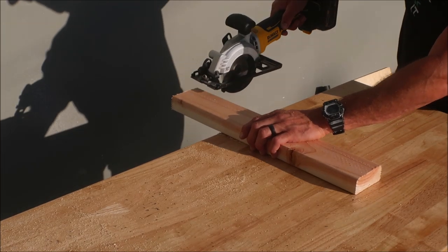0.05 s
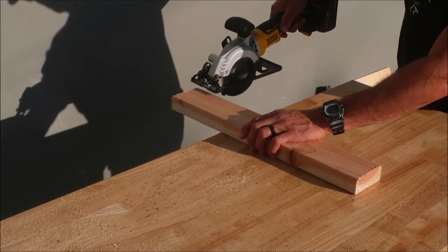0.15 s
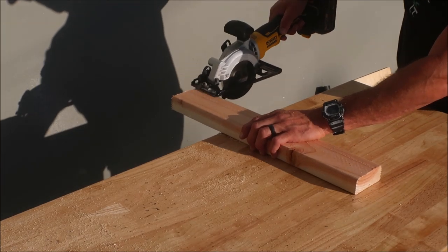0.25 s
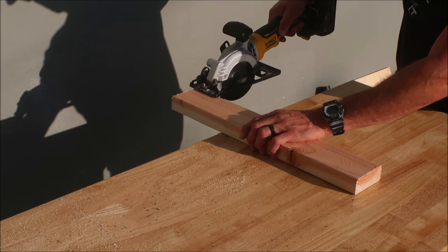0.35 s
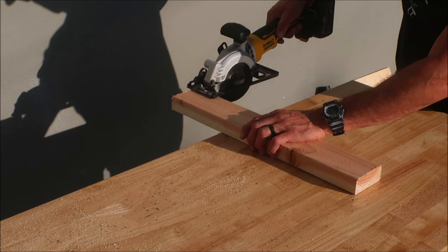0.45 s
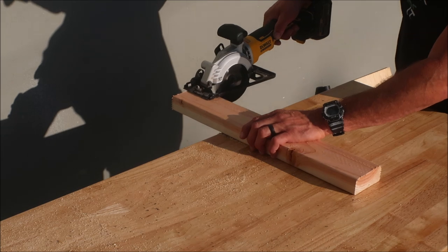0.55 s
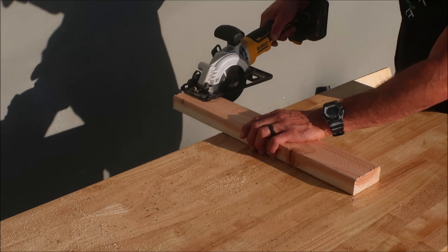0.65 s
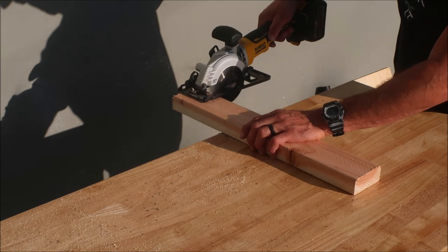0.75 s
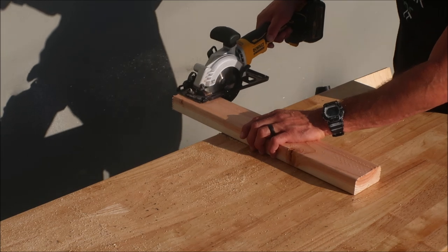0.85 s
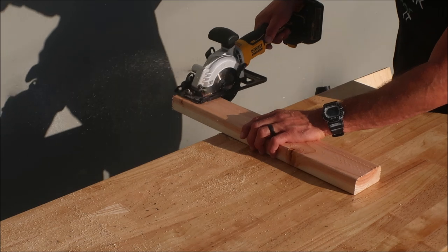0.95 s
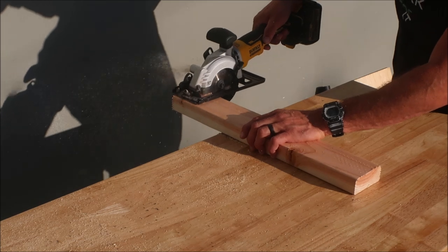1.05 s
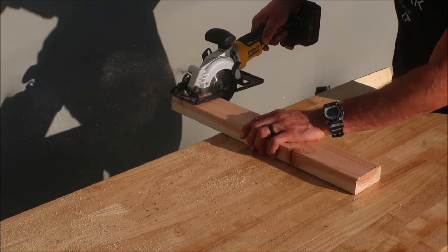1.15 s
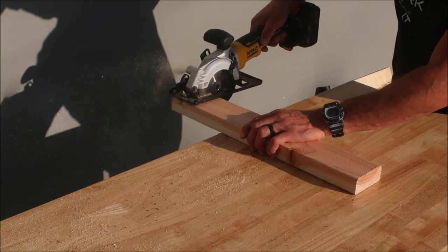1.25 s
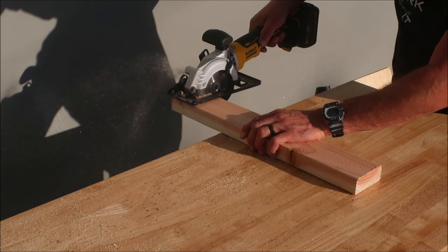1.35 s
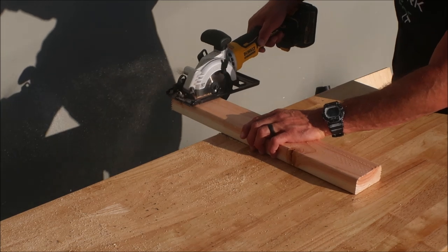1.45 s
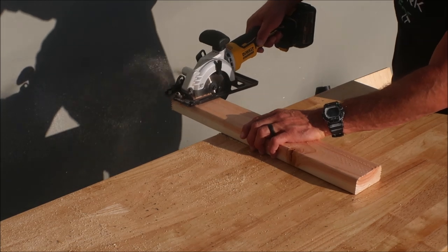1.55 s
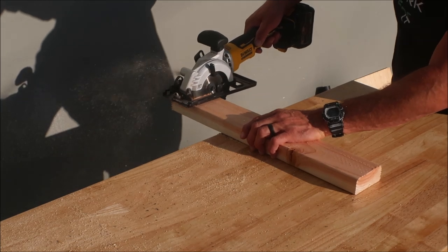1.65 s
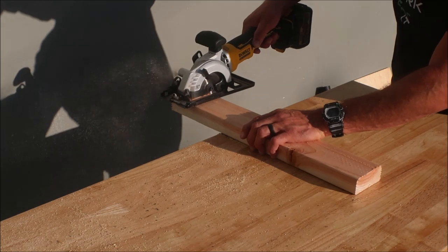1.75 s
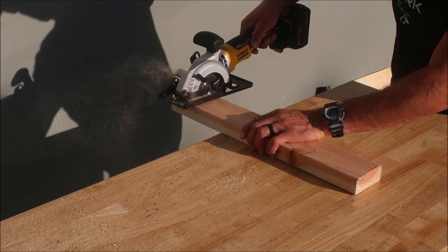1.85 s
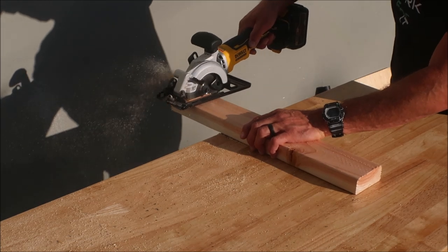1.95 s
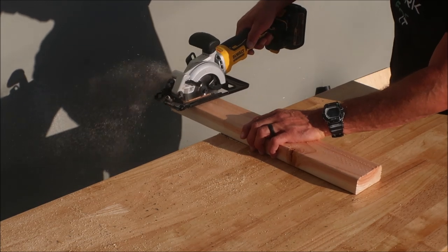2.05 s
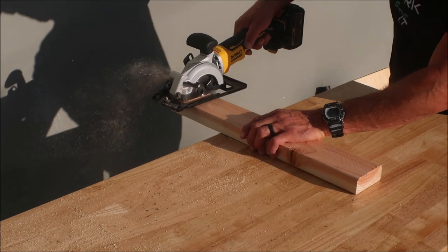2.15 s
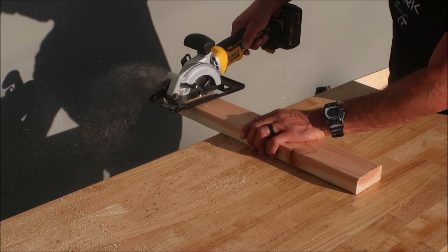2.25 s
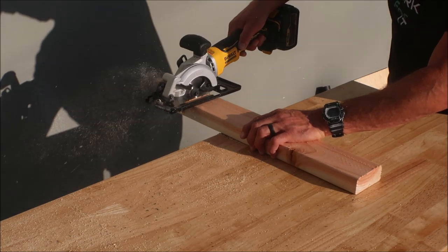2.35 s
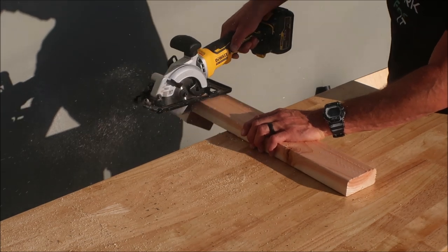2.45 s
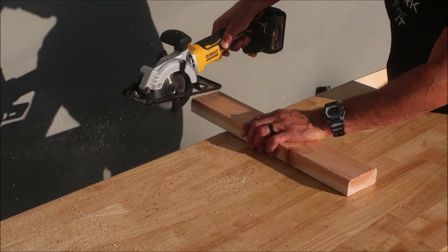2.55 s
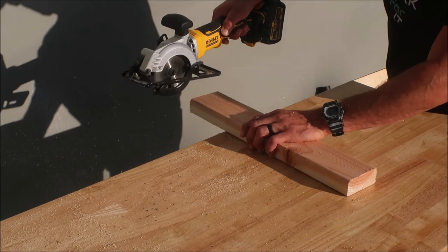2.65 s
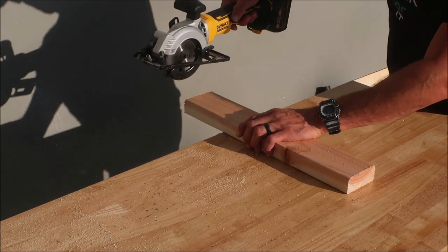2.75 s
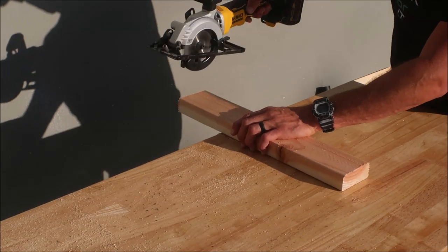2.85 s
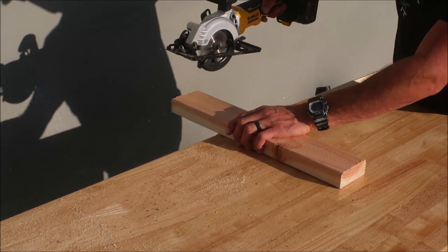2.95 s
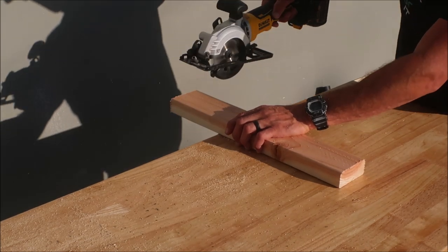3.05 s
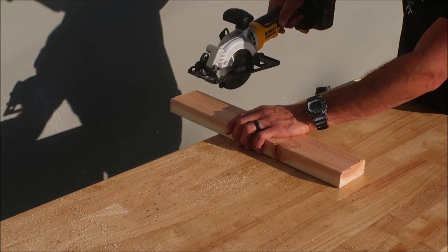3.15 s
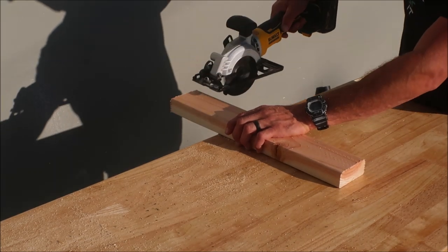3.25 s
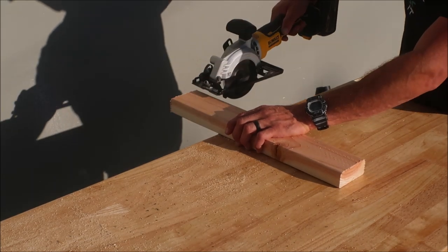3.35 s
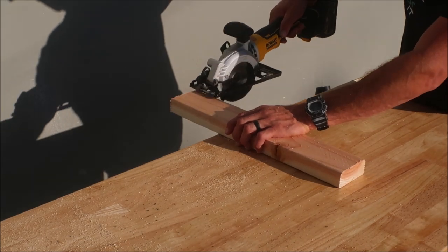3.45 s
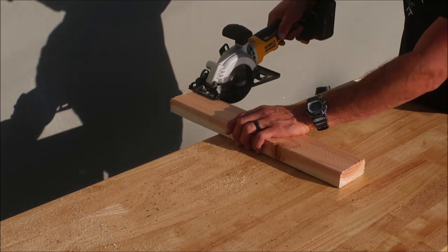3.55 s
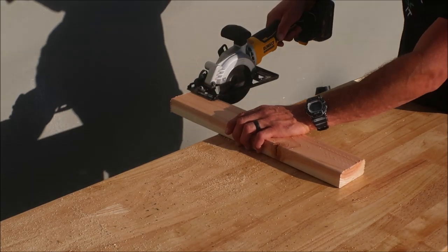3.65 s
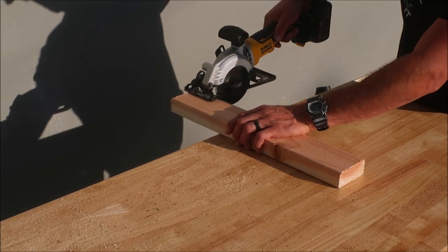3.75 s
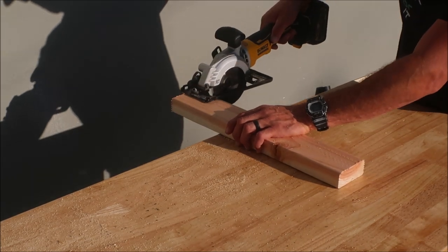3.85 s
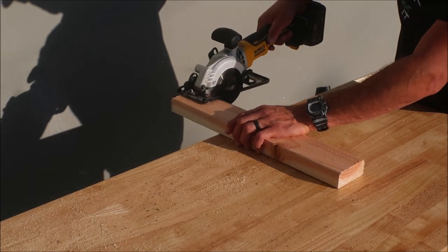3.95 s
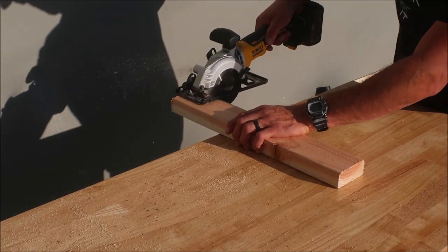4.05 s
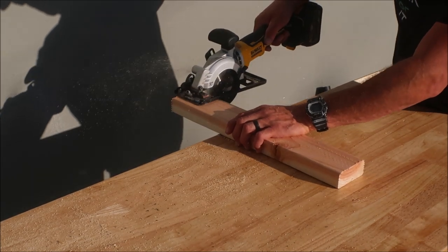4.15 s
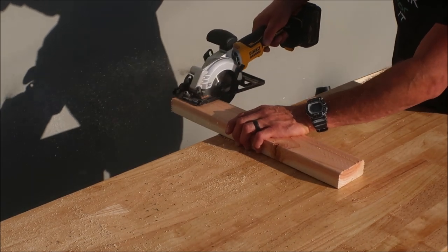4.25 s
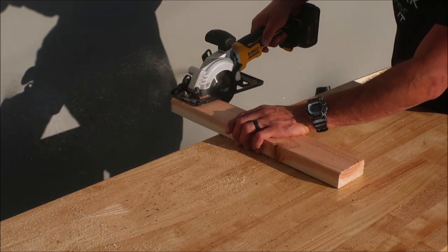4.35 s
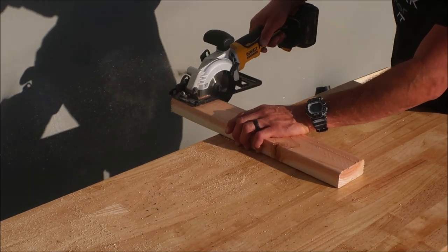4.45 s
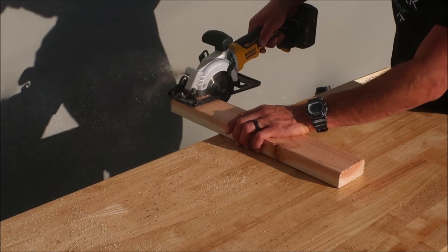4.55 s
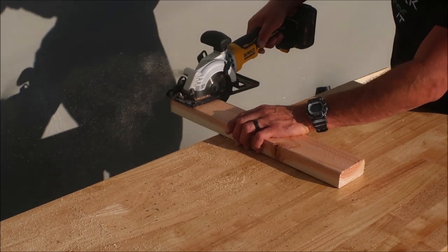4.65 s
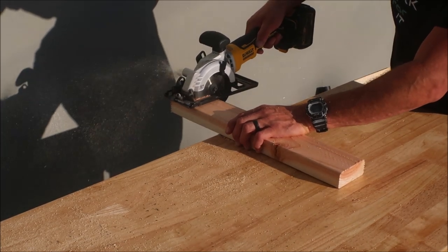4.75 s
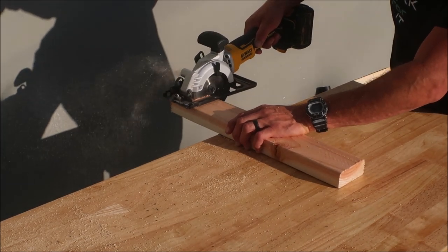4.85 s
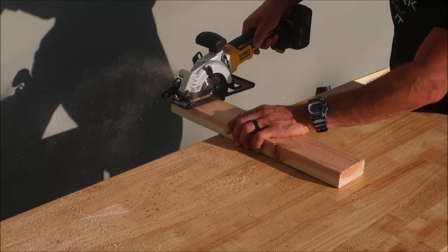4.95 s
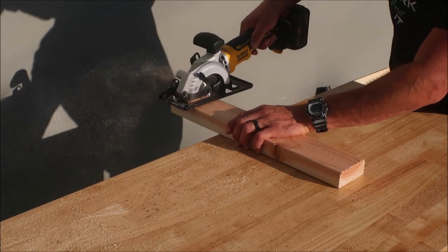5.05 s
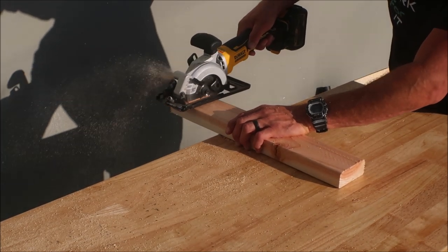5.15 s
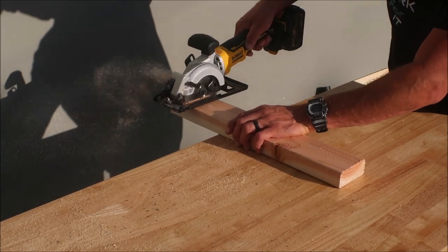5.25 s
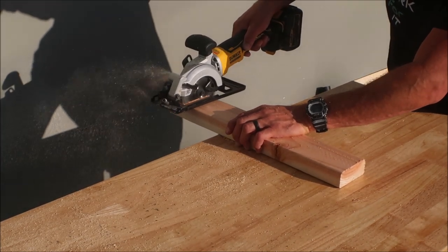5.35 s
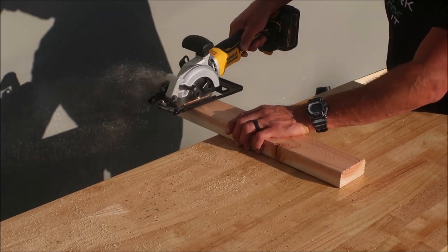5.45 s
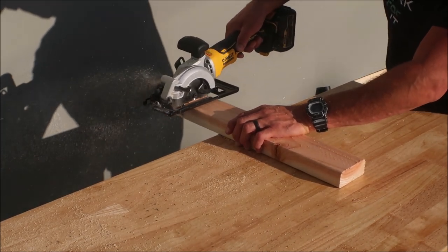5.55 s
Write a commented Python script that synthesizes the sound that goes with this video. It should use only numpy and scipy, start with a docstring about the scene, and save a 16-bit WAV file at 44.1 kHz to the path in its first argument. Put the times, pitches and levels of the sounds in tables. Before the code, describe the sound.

A small cordless circular saw whines steadily, then screeches through a wooden board twice, an offcut knocking down between the cuts.

```python
"""Circular saw on a wooden board

A small cordless circular saw runs over a bench outdoors and cuts twice through a board; an offcut drops.
Motor orders and gear whine sound as sines over the noise of the fan. Tooth blows excite resonances: the
skimming teeth make the steel blade ring, then the wood damps the sinking blade to a rasp and the motor labours.
Each cut is a touch, a few pushes, a sinking that slows the motor, and a release that lets it race."""
import sys
import numpy as np
from scipy import signal
from scipy.fft import rfft, irfft
from scipy.io import wavfile
from scipy.ndimage import map_coordinates

SR = 44100
rng = np.random.default_rng(int(sys.argv[2]) if len(sys.argv) > 2 else 0)


def output_pcm(signal):
    """Save a mono or channel-first signal as 16-bit PCM at the path in sys.argv[1].

    Samples are clipped to [-1, 1] before scaling.
    """
    pcm = np.clip(np.atleast_2d(signal).T, -1, 1) * 32767
    wavfile.write(sys.argv[1], SR, np.round(pcm).astype(np.int16))


N = 247401
TIME = np.arange(N) / SR
FREQ = np.maximum(np.arange(N // 2 + 1) * SR / N, 1)  # Hz
WHINE_ORDER, GEAR_RATIO, TEETH = 8, 6, 24  # whine cycles per motor turn, motor turns per blade turn, blade teeth


def undb(db):
    """Logarithmic level: decibels to amplitude gain."""
    return 10 ** (np.asarray(db) / 20)


def curves(rows):
    """Linear interpolation: each column of a table as a value per sample."""
    s, *columns = np.transpose(rows)
    return [np.interp(TIME, s, c) for c in columns]


def colour(points):
    """Spectral envelope: gain through (Hz, dB) points, straight over log frequency."""
    hz, db = np.transpose(points)
    return undb(np.interp(np.log(FREQ), np.log(hz), db))


def modes(rows, order=1):
    """Modal superposition of damped resonances in alternating sense; a higher order has steeper flanks."""
    response = 0
    for k, (hz, width, db) in enumerate(rows):
        detuning = (FREQ ** 2 - hz ** 2) / (FREQ * width * order)
        response = response + (-1) ** k * undb(db) / (1 + 1j * detuning) ** order
    return response


def through(x, response):
    """Linear filtering: multiply the spectrum by a response."""
    return irfft(rfft(x) * response, N)


def unit(x, lo_hz=0, hi_hz=SR):
    """Normalisation: scale a sound so that one band of it has rms 1."""
    return x / np.std(through(x, (FREQ > lo_hz) & (FREQ < hi_hz)))


def noise():
    """White noise: equal power at every frequency."""
    return rng.standard_normal(N)


def walk(rate_hz, size=32768):
    """Low-passed random fluctuation of standard deviation 1."""
    hz = np.arange(size // 2 + 1) * SR / N
    x = irfft(rfft(rng.standard_normal(size)) / (1 + (hz / rate_hz) ** 4), size)
    return np.interp(TIME, np.linspace(0, N / SR, size), x / np.std(x))


def split(x, hz):
    """Complementary crossover: the parts of a sound below and above a frequency."""
    low = through(x, 1 / (1 + (FREQ / hz) ** 24))
    return low, x - low


def ramp(start_s, length_s):
    """Linear envelope rising from 0 to 1."""
    return np.clip((TIME - start_s) / max(length_s, 1e-4), 0, 1)


def swell(top_s, rise_s, fall_s):
    """Triangular envelope: a straight rise to 1 and a straight fall."""
    return ramp(top_s - rise_s, rise_s) - ramp(top_s, fall_s)


# the two cuts: land_s (plate), touch_s (teeth), swing_s (guard swings back), sink_s, deepest_s, out_s (through),
# sag_hz (drop of the whine), release_power (lateness of release), plate_db (hum), ping_db (first touch),
# board_db, offcut_db, hold_s (governor holds the speed), skim_db (note of the skimming teeth)
CUTS = [(0.34, 0.683, 1.14, 1.68, 2.30, 2.455, 480.7, 3.0, -58.5, -37, -38, -55.5, .08, -59),
        (3.795, 3.936, 4.54, 4.95, 5.42, 5.645, 345.8, 1.3, -68, -28, -38.5, -63, .03, -52.5)]
CUT_COLUMNS = ("land_s touch_s swing_s sink_s deepest_s out_s sag_hz release_power "
               "plate_db ping_db board_db offcut_db hold_s skim_db").split()


def cuts(names):
    """Event timing and levels: the named columns of each cut."""
    return [[row[CUT_COLUMNS.index(name)] for name in names.split()] for row in CUTS]


TOUCH_S, EXIT_S = 0.0058, 0.074  # the teeth meet and leave the wood
SINK_POWER = 0.25  # the round blade buries itself fast at first, then slowly
FREE_HZ = 3539  # gear whine of the free-running saw
TOUCH_DIP_HZ, DIP_S, DIP_RECOVER_S = 88.8, .055, .5  # the first touch brakes the motor
RACE_DELAY_S = .009  # the load is gone this long after the blade is through
OVERSHOOT_HZ, HUNT_HZ, HUNT_DECAY_S = 753.4, 2.85, .088  # once through, the motor races and settles


def feed():
    """Load and speed: contact, depth and motor strain (each 0-1) and the whine in Hz, which load lowers."""
    contact, depth, strain, hz = 0, 0, 0, FREE_HZ
    columns = "touch_s sink_s deepest_s out_s sag_hz release_power hold_s"
    for touch, sink, deepest, out, sag_hz, release_power, hold_s in cuts(columns):
        race = out + RACE_DELAY_S
        held = 1 - ramp(deepest, race - deepest) ** release_power
        load = held * np.sin(np.pi / 2 * ramp(sink + hold_s, deepest - sink - hold_s)) ** 2
        since = np.maximum(TIME - race, 0)
        hunt = OVERSHOOT_HZ * np.exp(-since / HUNT_DECAY_S) * np.sin(2 * np.pi * HUNT_HZ * since)
        dip = TOUCH_DIP_HZ * swell(touch + DIP_S, DIP_S, DIP_RECOVER_S)
        hz = hz - dip - sag_hz * load + hunt
        contact = contact + ramp(touch, TOUCH_S) - ramp(out - EXIT_S / 2, EXIT_S)
        sunk = ramp(sink, deepest - sink) ** SINK_POWER
        depth = depth + sunk * (1 - ramp(out - EXIT_S / 2, EXIT_S / 2))
        strain = strain + load
    return contact, depth, strain, hz


# the buried blade grabs and shakes the gears: start_s, end_s, level_db
JUDDERS = [(2.143, 2.156, -35), (2.17, 2.178, -25), (2.225, 2.256, -32), (2.292, 2.336, -30.5),
           (2.375, 2.39, -34), (5.204, 5.238, -36), (5.34, 5.407, -36), (5.504, 5.549, -36)]


def judders(edge_s=0.0097):
    """Intermittent grabbing: strength of the bursts in which the buried blade catches."""
    bursts = 0
    for start, end, db in JUDDERS:
        gate = ramp(start - edge_s / 2, edge_s) - ramp(end - edge_s / 2, edge_s)
        bursts = bursts + undb(db) * gate
    return bursts


# bursts of tooth noise: harder pushes into the wood, and a short ringing tail as the blade comes out:
# start_s, end_s, level_db, treble_db (relative to level_db)
BITES = [(0.699, 0.742, -24, -21), (0.777, 0.807, -32.5, -11), (0.831, 0.855, -29, -11.5),
         (0.86, 0.918, -36, -3.5), (0.923, 0.995, -33.5, -4.5), (0.985, 1.092, -31.5, -10),
         (1.092, 1.198, -33, -6), (1.19, 1.247, -30.5, -17), (1.397, 1.448, -29, -13.5),
         (1.451, 1.57, -29, -13.5), (1.668, 1.718, -31.5, -18), (1.76, 1.888, -31, -14),
         (1.915, 1.966, -33, -9), (2.053, 2.18, -34, -13), (2.28, 2.4, -39, -31),
         (2.432, 2.447, -25.5, -30), (2.476, 2.502, -42, -12), (3.944, 4.019, -33, -7),
         (4.021, 4.11, -30, -8), (4.133, 4.202, -37, -10), (4.211, 4.235, -28.5, -8.5),
         (4.244, 4.544, -31.5, -8), (4.659, 4.683, -30.5, -24), (4.693, 4.722, -27.5, -14),
         (4.724, 4.795, -28, -14), (4.845, 4.977, -32, -11.5), (5, 5.148, -31, -9.5),
         (5.13, 5.409, -41.5, 0.5), (5.412, 5.544, -32.5, -9.5)]
BITE_ATTACK_S, BITE_RELEASE_S = 0.031, 0.034


def bite(contact, depth, judder):
    """Power addition: tooth noise and its treble sum a light skim, the depth and the bursts."""
    skim_db, buried_db, judder_db, grain_db = -40, -40, -7, -0.06
    skim_treble_db, buried_treble_db = -44, -53.5
    power = (contact * undb(skim_db)) ** 2 + (depth * undb(buried_db)) ** 2 + (judder * undb(judder_db)) ** 2
    treble = (contact * undb(skim_treble_db)) ** 2 + (depth * undb(buried_treble_db)) ** 2
    for start, end, db, bright_db in BITES:
        attack = ramp(start - BITE_ATTACK_S / 2, BITE_ATTACK_S)
        burst = attack - ramp(end - BITE_RELEASE_S / 2, BITE_RELEASE_S)
        power = power + (burst * undb(db)) ** 2
        treble = treble + (burst * undb(db + bright_db)) ** 2
    grain = undb(grain_db * walk(12))
    return grain * np.sqrt(power), np.sqrt(grain * treble)


# spectrum of the rumble: frequency_hz, level_db
RUMBLE_COLOUR = [(20, -18), (35, -7), (55, 9), (67, -9), (84, 11.5), (105, 5.5), (150, -0.5), (300, -29.5)]
# level of the deepest rumble: time_s, level_db
DEEP_RUMBLE = [(0.0, -71), (0.64, -64), (0.87, -80), (2.53, -75), (4.27, -59.5), (4.62, -73), (5.28, -62),
               (5.61, -72)]
GUST_RISE_S, GUST_FALL_S = 1.15, 0.54  # the rumble swells as the saw comes down on the board


def rumble(calm_db=-68, gust_db=14):
    """Low-frequency noise of moving air, swelling before each cut."""
    gust = sum(swell(touch, GUST_RISE_S, GUST_FALL_S) for touch, in cuts("touch_s"))
    deep, upper = split(through(noise(), colour(RUMBLE_COLOUR)), 66)
    deep_db, = curves(DEEP_RUMBLE)
    return undb(calm_db + gust_db * gust) * unit(upper) + undb(deep_db) * unit(deep)


# rush of fan and spinning blade, before the trim: time_s, level_db
AIR = [(0, -38.5), (.3, -37), (.7, -33.5), (1.2, -37), (1.35, -41), (1.7, -40), (2.38, -35.5), (2.56, -43),
       (2.85, -41), (3.5, -36.5), (3.93, -33), (4.5, -38.5), (4.6, -43), (5.05, -39), (5.61, -37)]
# spectrum of the rush: frequency_hz, level_db
AIR_COLOUR = [(76, -43), (130, -16.5), (331, -15.5), (825, -11.5), (1360, -5), (1590, -9.5), (2180, 0.5),
              (2770, -5), (3590, -3), (3810, -4.5), (5450, -12), (8200, -30.5), (10400, -33.5),
              (13900, -47), (15000, -67)]
# motor housing resonances, relative levels: frequency_hz, width_hz, level_db
HOUSING = [(1310, 68, -5), (2080, 170, -14), (2432, 115, 7.5), (3056, 73, 9), (5300, 88, 4), (6600, 110, 9)]


def air(turns, contact, covered_db=-3, rattle_db=1.0, throb=0.096, housing_db=-3.0, trim_db=-2.09, treble_db=-9):
    """Amplitude-modulated noise: fan rush and gear rattle pulse once a blade turn; contact thins the bass."""
    level_db, = curves(AIR)
    pulse = 1 + throb * np.sin(2 * np.pi * turns / GEAR_RATIO)
    rush = noise() * undb(rattle_db * walk(740)) * pulse
    shell = np.sqrt(1 + np.abs(undb(housing_db) * modes(HOUSING)) ** 2)
    low, high = split(through(rush, colour(AIR_COLOUR) * shell), 3640)
    low, high = unit(low, 1200, 3200), unit(high, 4000, 7000)
    bass, middle = split(low, 665)
    return undb(level_db + trim_db) * (undb(covered_db * contact) * bass + middle + undb(treble_db) * high)


OFFCUT_HZ, OFFCUT_FALL_HZ_PER_S = 170, 108  # sway of the offcut at the moment it parts, and its steady fall
OFFCUT_RISE_S, OFFCUT_FADE_S = 0.33, 0.14
HUM_WAVER_DB = 2  # unsteadiness of the wood's low notes


def hum(turns, depth, strain, treble):
    """Forced vibration: motor unbalance through the plate, cutting force and swaying offcut drive low notes."""
    stray_rad, land_s, rest_s, lift_s = 0.58, 0.11, 0.26, 0.54
    force_db, buried_db, plate_note_db = -31, -65, -1.0
    blade = turns / GEAR_RATIO
    force = undb(force_db) * treble + undb(buried_db) * depth ** 2 * (1 - strain) ** 2
    fourth, seventh = 4 * blade, 7 * blade
    notes = [(fourth, force)]
    for land, touch, out, plate_db, offcut_db in cuts("land_s touch_s out_s plate_db offcut_db"):
        plate = undb(plate_db) * (ramp(land - land_s, land_s) - ramp(touch + rest_s, lift_s))
        shaken = plate * ramp(touch, land_s)
        sway_hz = OFFCUT_HZ + OFFCUT_FALL_HZ_PER_S * (out - TIME)
        sway = np.cumsum(sway_hz) / SR
        loose = swell(out - OFFCUT_FADE_S, OFFCUT_RISE_S, 2 * OFFCUT_FADE_S)
        notes += [(turns, plate), (fourth, undb(plate_note_db) * shaken), (seventh, shaken),
                  (sway, undb(offcut_db) * loose ** 2)]
    total = 0
    for cycles, gain in notes:
        waver = undb(HUM_WAVER_DB * walk(8.5))
        total = total + gain * waver * np.sin(2 * np.pi * cycles + stray_rad * walk(19))
    return np.sqrt(2) * total


# knocks of offcut and saw: start_s, wood_peak_db, clack_peak_db
KNOCKS = [(2.626, -32, -49), (2.633, -34, -48), (2.641, -32.5, -45), (2.649, -40, -40), (2.867, -39, -42),
          (2.874, -40, -35), (2.881, -40, -32), (3.25, -44, -41), (4.526, -33, -46), (4.533, -29.5, -42)]
# spectrum of the clack: frequency_hz, level_db
CLACK_COLOUR = [(100, -22), (300, -10), (900, -6), (2200, 4), (3200, -15), (6000, -28), (12000, -45)]
# knocked wood, relative levels: frequency_hz, width_hz, level_db
KNOCK_MODES = [(570, 100, -23), (906, 34, 3), (1160, 90, -5), (1323, 38, 13), (1830, 120, 4.5),
               (2360, 330, 2)]


def knocks(contact_s=0.00019, scrape_s=0.0071, scrape_db=-20):
    """Impulse response: sharp blows with a short scrape ring the wood; hard parts add a broad clack."""
    out = np.zeros(N)
    wood, clack = modes(KNOCK_MODES), colour(CLACK_COLOUR)
    for s, db, clack_db in KNOCKS:
        since = np.maximum(TIME - s, 0)
        scrape = noise() * (TIME >= s) * np.exp(-since / scrape_s)
        push = (TIME >= s) * np.exp(-since / contact_s)
        ring = through(push + undb(scrape_db) * scrape, wood)
        crack = through(scrape, clack)
        out += undb(db) * ring / np.abs(ring).max() + undb(clack_db) * crack / np.abs(crack).max()
    return out


# board and sole plate, relative levels: frequency_hz, width_hz, level_db
BOARD = [(705, 72, -10), (1484, 135, 2), (1790, 64, 1.5), (1686, 78, -3.5), (2244, 110, 7.5)]
# last sliver of wood that holds the offcut: frequency_hz, width_hz, level_db
SLIVER = [(2135, 19, 0)]


def board(turns, contact, depth, skim_db=-54, depth_power=4.3):
    """Modal excitation: deeper teeth shake the board harder; the last sliver buzzes before it parts."""
    sliver_db, sliver_lead_s, sliver_rise_s = -37, 0.072, 0.046
    gain, sliver = undb(skim_db) * contact, 0
    for touch, out, board_db in cuts("touch_s out_s board_db"):
        gain = gain + undb(board_db) * (TIME > touch) * (TIME < out) * depth ** depth_power
        sliver = sliver + undb(sliver_db) * swell(out - sliver_lead_s, sliver_rise_s, sliver_lead_s)
    blows = teeth(turns, tear=7.1, chatter_db=-0.5)
    return gain * unit(through(blows, modes(BOARD))) + sliver * unit(through(blows, modes(SLIVER)))


# motor and gear tones, before the gear case: multiple of the motor's turn, free_db, full_load_db
MOTOR_ORDERS = [(3, -64.5, -61), (5, -58, -59), (7, -80, -47.5), (9, -58, -61), (10, -78, -60),
                (12, -82, -52.5), (13, -90, -63), (16, -78, -57.5), (19, -82.5, -78)]
# gear case resonances over the direct tone: frequency_hz, width_hz, level_db
GEAR_CASE = [(5170, 33, 13), (7075, 130, 9), (8400, 110, 7.5)]
# gear whine, changing as the saw is turned in the hand: time_s, level_db
WHINE = [(0, -37.5), (.42, -37.5), (.69, -32), (.74, -40.5), (1.19, -37), (1.33, -50), (1.68, -48),
         (1.82, -36), (2.02, -47), (2.42, -55), (2.465, -46), (2.52, -45), (2.572, -39), (2.592, -59),
         (2.625, -40.5), (2.68, -48), (2.74, -44.5), (2.775, -38.5), (3.14, -38.5), (3.35, -50),
         (3.62, -44.5), (3.93, -32.5), (4.14, -44.5), (4.52, -31.5), (4.58, -70), (4.9, -50), (5.04, -35),
         (5.14, -42), (5.22, -40), (5.3, -39), (5.61, -46)]


def motor(turns, depth, strain, judder):
    """Order tones follow the motor's turn; load roughens the mesh, and the gear case's resonance lifts tones."""
    flutter_rad, load_flutter_rad = 0.055, 0.62  # wander of the whine's phase, free and added with depth
    shimmer_db, load_shimmer_db, strain_db = 0.7, 3.0, -44
    calm_waver_db, waver_db = 1.5, 2.5
    wander = flutter_rad * walk(44) + load_flutter_rad * depth * walk(58)
    angle = 2 * np.pi * turns + wander / WHINE_ORDER
    whine_db, = curves(WHINE)
    shimmer = undb((shimmer_db + load_shimmer_db * depth) * (walk(43) - depth / 2))
    mesh = np.hypot(undb(whine_db), undb(strain_db) * strain) * shimmer
    whine = np.hypot(mesh, judder) * np.sin(WHINE_ORDER * angle)
    tones = 0
    for order, free_db, loaded_db in MOTOR_ORDERS:
        level_db = free_db + depth * (loaded_db - free_db)
        level_db = level_db + (calm_waver_db + depth * waver_db) * walk(8.2)
        tones = tones + undb(level_db) * np.sin(order * angle)
    case = np.hypot(1, np.abs(modes(GEAR_CASE)))
    return np.sqrt(2) * (whine + through(tones, case))


CLINK_S, CLINK_HZ, CLINK_DECAY_S, CLINK_DB = 4.522, 3267, 0.01, -21.5  # the guard clinks as it snaps back


def clink():
    """Free decay: one short ring of the guard dies away exponentially."""
    since = np.maximum(TIME - CLINK_S, 0)
    envelope = ramp(CLINK_S, 0.0024) * np.exp(-since / CLINK_DECAY_S)
    return undb(CLINK_DB) * envelope * np.sin(2 * np.pi * CLINK_HZ * since)


# rim of the blade: frequency_hz, width_hz, level_db
SQUEAL = (7190, 64, -53)


def squeal(swell_db=5.0):
    """Narrow-band resonance: with the guard back, the blade's rim squeals thinly until it sinks in."""
    hz, width, db = SQUEAL
    gate = 0
    for swing, sink in cuts("swing_s sink_s"):
        gate = gate + ramp(swing, BITE_ATTACK_S) - ramp(sink, BITE_RELEASE_S)
    return gate * undb(db + swell_db * walk(26)) * unit(through(noise(), modes([(hz, width, 0)], order=2)))


def teeth(turns, uneven_db=-1.0, scatter_db=1.5, tear=47.0, chatter_db=0.2):
    """Periodic impact: teeth, some standing proud, strike and tear fibres while the saw chatters in the hand."""
    phase = turns / GEAR_RATIO * TEETH
    tooth = phase.astype(int)
    proud_db = uneven_db * rng.standard_normal(TEETH)[tooth % TEETH]
    size = undb(proud_db + scatter_db * noise()[tooth])
    strikes = np.diff(phase % 1, prepend=0)  # a spike at every tooth
    fibres = noise() * np.exp(-(phase % 1) / .5)
    return size * (unit(strikes) + tear * unit(fibres)) * undb(chatter_db * walk(69))


# blade and saw body pinched in the kerf: frequency_hz, width_hz, light_load_db, full_load_db
PINCHED = [(1467, 38, -45.5, -44.5), (2124, 31, -43.5, -52), (2522, 74, -38.5, -43), (3037, 29, -63, -39.5),
           (3950, 39, -47, -52), (4420, 61, -42.5, -56), (5024, 97, -45.5, -72), (5650, 33, -50, -61)]


def binding(turns, depth, strain, swell_db=2.5):
    """Selective resonance: pinched blade and body ring at notes that come and go, rebalanced by load."""
    blows, out = teeth(turns), 0
    for hz, width, light_db, heavy_db in PINCHED:
        ring = unit(through(blows, modes([(hz, width, 0)], order=2)))
        out = out + ring * undb(light_db + strain * (heavy_db - light_db) + swell_db * walk(9.1))
    return depth * out


# hoarse notes, relative to the tooth noise: multiple of the motor's turn, skimming_db, buried_db
GRIND_ORDERS = [(4, -15, -6.5), (6, -25, -15), (7, -32, -21), (8, -10, -10), (12, -10, -19), (13, -17, -24)]


def grind(turns, depth, strain, force, treble, spread_hz=26):
    """Random modulation of order tones: hoarse notes of the working blade fall and rise with its speed."""
    out = 0
    for order, skim_db, buried_db in GRIND_ORDERS:
        angle = 2 * np.pi * order * turns
        gain = undb(skim_db) * treble * (1 - depth) + undb(buried_db) * force * depth * strain
        out = out + gain * (walk(spread_hz) * np.sin(angle) + walk(spread_hz) * np.cos(angle))
    return out


TOOTH_FLUTTER, LOAD_FLUTTER = .3, .4  # radians of wander in the teeth's note, free and added with depth


def tooth_note(turns, contact, depth, strain, shimmer_db=2.5, strain_db=-42, ping_s=0.027):
    """Tooth-passing tone: a ping at first touch, then a hoarser note that grows as the motor strains."""
    ping, skim = 0, 0
    for touch, out, ping_db, skim_db in cuts("touch_s out_s ping_db skim_db"):
        ping = ping + undb(ping_db) * swell(touch + 2 * TOUCH_S, TOUCH_S, ping_s)
        skim = skim + undb(skim_db) * (TIME > touch) * (TIME < out)
    labour = undb(strain_db) * np.sqrt(strain) * depth
    steady = (skim * contact * (1 - depth) + labour) * undb(shimmer_db * walk(42))
    wander = (TOOTH_FLUTTER + LOAD_FLUTTER * depth) * walk(80)
    angle = 2 * np.pi * turns / GEAR_RATIO * TEETH + wander
    return np.sqrt(2) * (ping + steady) * np.sin(angle)


# steel blade, with one low resonance of the wood or saw shoe near 890 Hz, relative levels: frequency_hz,
# width_hz, level_db
BLADE = [(890, 70, -24), (1780, 30, -28), (2490, 65, -2), (2620, 45, 0), (2705, 45, 1), (2990, 25, -15),
         (3490, 40, -8), (4080, 50, -17), (4430, 35, -8), (4780, 60, -22), (5090, 26, -7), (5370, 50, -16),
         (5680, 30, -14), (6420, 30, -19), (6740, 80, -9), (6970, 60, -18), (7340, 30, -19),
         (7620, 110, -23), (7950, 50, -24), (8430, 40, -24), (8685, 20, -12), (8845, 26, -17),
         (9850, 50, -27), (10130, 50, -24), (10440, 90, -23), (11490, 90, -20), (11830, 40, -28),
         (12260, 80, -18), (13180, 200, -25), (14030, 110, -18), (14700, 120, -27)]


def blade_ring(blows, drift_s=0.00004, drift_hz=9, shift_db=3.0, count=3):
    """Plate modes: as the contact point moves, groups of modes bend in pitch and trade strength."""
    out = 0
    for k in range(count):
        ring = through(blows, modes(BLADE[k::count], order=2))
        read_at = (TIME + drift_s * walk(drift_hz)) * SR  # a wandering delay bends the pitch
        bent = map_coordinates(ring, [read_at], order=3, mode="mirror")
        out = out + bent * undb(shift_db * walk(6.7))
    return out


# blade guard, relative levels: frequency_hz, width_hz, level_db
GUARD = [(3280, 25, -1.5), (3910, 24, -3.5), (4308, 29.4, 1), (5300, 38, -9.5)]
# spectrum of the rasp in the kerf: frequency_hz, level_db
KERF_COLOUR = [(240, -80), (400, -21), (640, -25), (768, -16.5), (1270, -9.5), (1570, -10), (1910, -10),
               (2300, -4.5), (2540, 8), (2870, -10.5), (3150, 1), (3610, -4.5), (4150, -13), (4400, -2.5),
               (4600, -18), (5650, -14), (6710, -17.5), (8100, -24), (11800, -34), (15000, -26)]
# upper modes of the buried blade, broadened by the wood: frequency_hz, width_hz, level_db (over the rasp)
KERF_RING = [(6200, 90, 3), (6520, 110, 6), (6800, 90, 5), (7300, 80, 4), (8300, 70, 4), (8850, 120, 7),
             (9760, 140, 15.5), (10260, 190, 13), (10800, 150, 1), (12300, 150, 7), (13100, 260, 11),
             (14030, 170, 9)]
# hiss of flying chips: frequency_hz, level_db
CHIPS_COLOUR = [(200, -53), (500, -23), (1500, -9), (3500, 4), (5500, 18.5), (7500, 16.5), (9300, -5),
                (11500, -14), (14000, -17)]


def cutting(turns, depth, force, treble):
    """Damping: blows ring the free blade and guard, but rasp once the wood buries the blade."""
    damping_db, guard_back_db, swing_s = 10, -10, 0.26
    chips_db, rasp_db, bite_trim_db, middle_db = -14, -3.0, -0.16, 5
    blows = teeth(turns)
    back = sum(ramp(swing, swing_s) - ramp(out, swing_s) for swing, out in cuts("swing_s out_s"))
    guard = undb(guard_back_db * back) * through(blows, modes(GUARD, order=2))
    ring = unit(blade_ring(blows) + guard, 2300, 2900)
    kerf = colour(KERF_COLOUR) * np.hypot(1, np.abs(modes(KERF_RING, order=2)))
    rasp = unit(through(teeth(turns, chatter_db=1.6), kerf), 2300, 2900)
    chips = unit(through(teeth(turns, chatter_db=3.0), colour(CHIPS_COLOUR)))
    mixed = undb(-damping_db * depth) * ring + undb(rasp_db) * depth * rasp + undb(chips_db) * chips
    low, high = split(mixed, 4320)
    low, high = unit(low, 2300, 2900), unit(high)
    screech, middle = split(low, 3100)
    # the screech follows the force, the top the treble, and the modes between follow both
    return undb(bite_trim_db) * force * screech + undb(middle_db) * np.sqrt(force * treble) * middle + treble * high


# difference between two close ports, before the width setting: frequency_hz, side_minus_mid_db
WIDTH = [(60, -47), (110, -39), (200, -25), (380, -16), (700, -21.5), (1290, -38.5), (2380, -21),
         (4400, -6.5), (8120, 3.5), (15000, -3)]


def ports(x, scatter_s=0.0029, drift_hz=9, width_db=-2.5, count=4):
    """Decorrelation: reflections off bench and walls reach two ports differently and shift as the saw moves."""
    side, width = 0, undb(width_db) * colour(WIDTH)
    for _ in range(count):
        echoes = noise() * np.exp(-TIME / scatter_s)
        spectrum = rfft(echoes) / np.linalg.norm(echoes)
        side = side + walk(drift_hz) * through(x, width * spectrum) / np.sqrt(count)
    return np.array([x + side, x - side])


def scene():
    """Common drive: the feed sets load and speed; one motor speed drives whine, fan pulse and teeth."""
    contact, depth, strain, whine_hz = feed()
    judder = judders()
    force, treble = bite(contact, depth, judder)
    turns = np.cumsum(whine_hz / WHINE_ORDER) / SR  # motor turns so far
    wood = hum(turns, depth, strain, treble) + knocks() + board(turns, contact, depth)
    blade = squeal() + binding(turns, depth, strain) + grind(turns, depth, strain, force, treble)
    blade = blade + tooth_note(turns, contact, depth, strain) + cutting(turns, depth, force, treble)
    saw = air(turns, contact) + motor(turns, depth, strain, judder) + clink() + blade
    return ports(rumble() + wood + saw)


TOP_HZ = 15000


def record(dry):
    """Band limiting: a steep elliptic low-pass cuts the top."""
    return signal.sosfilt(signal.ellip(10, .2, 80, TOP_HZ, fs=SR, output="sos"), dry)


dry = scene()
out = record(dry)
output_pcm(out)
```